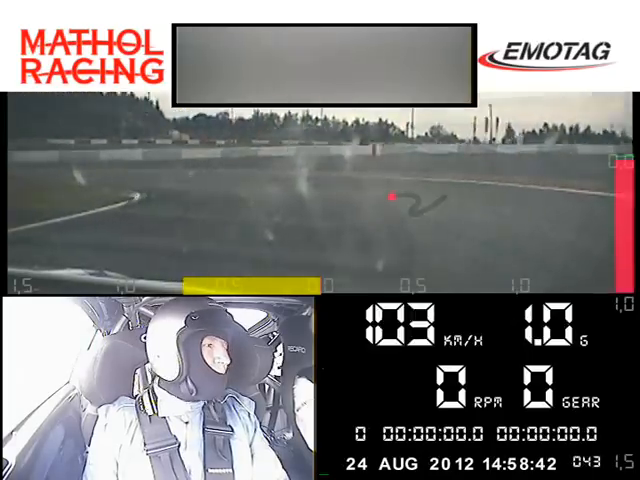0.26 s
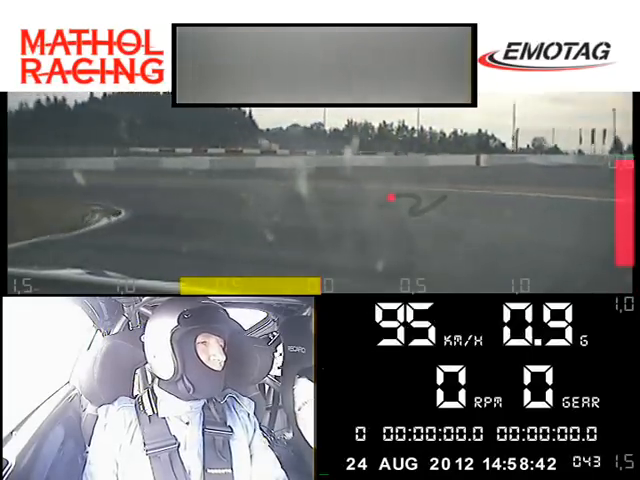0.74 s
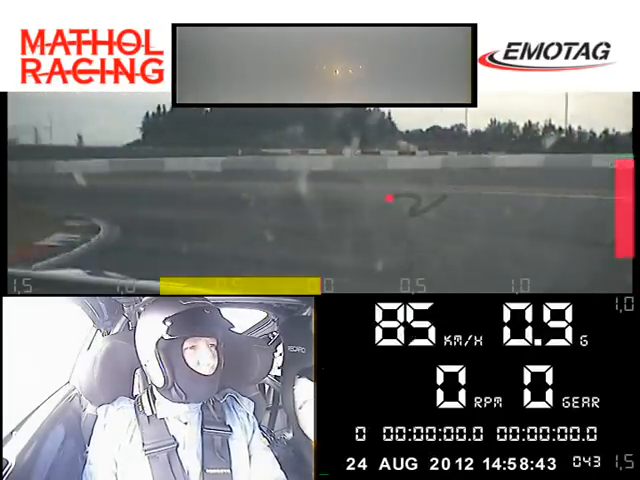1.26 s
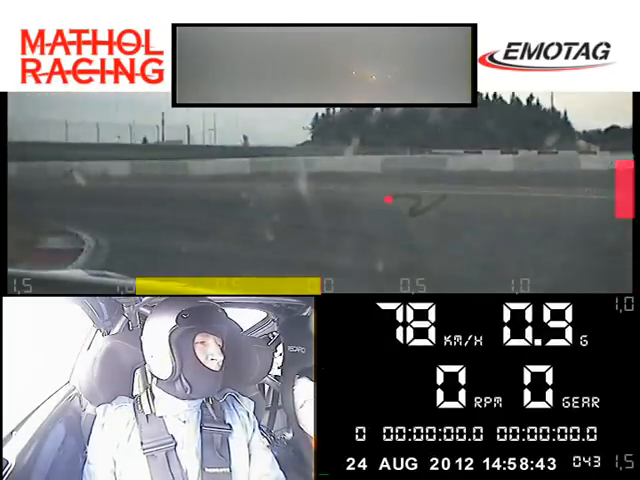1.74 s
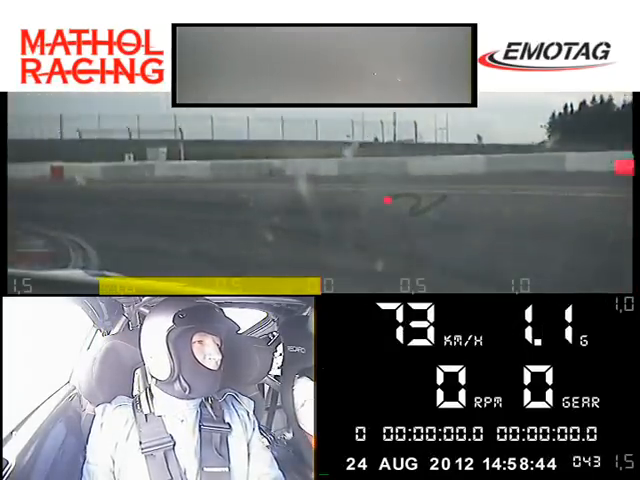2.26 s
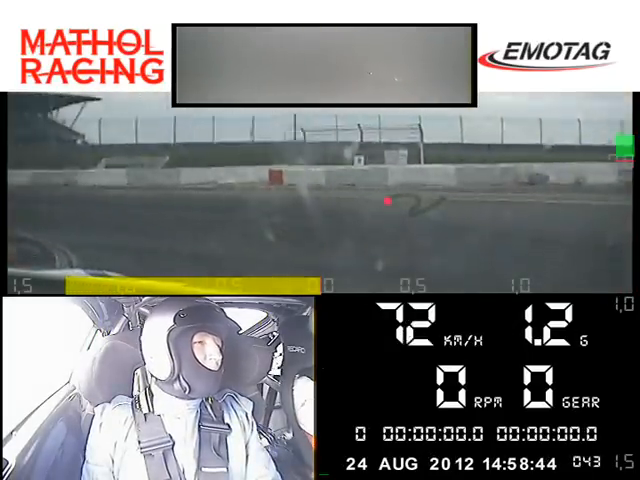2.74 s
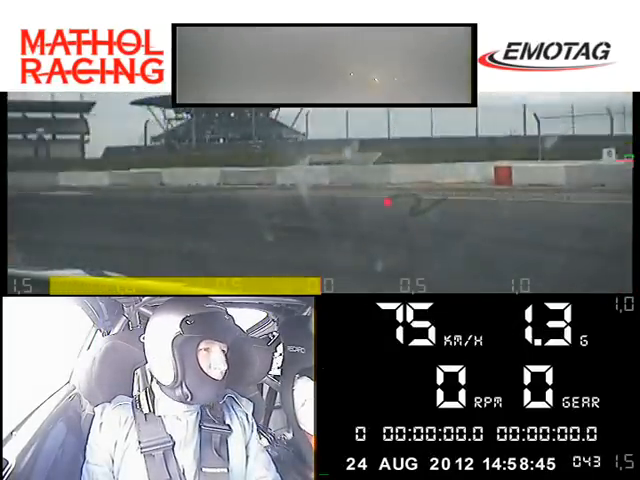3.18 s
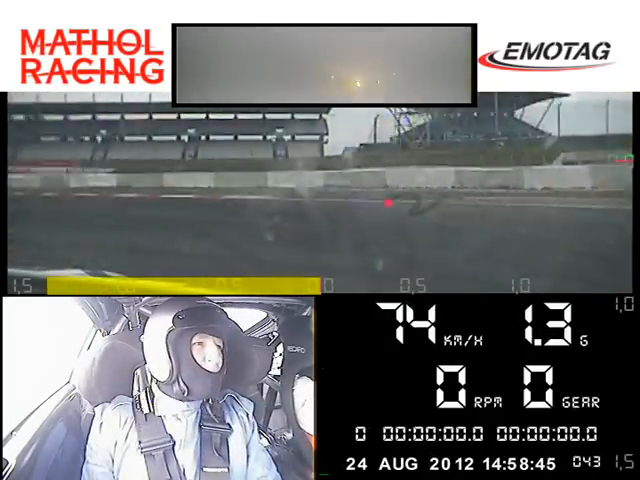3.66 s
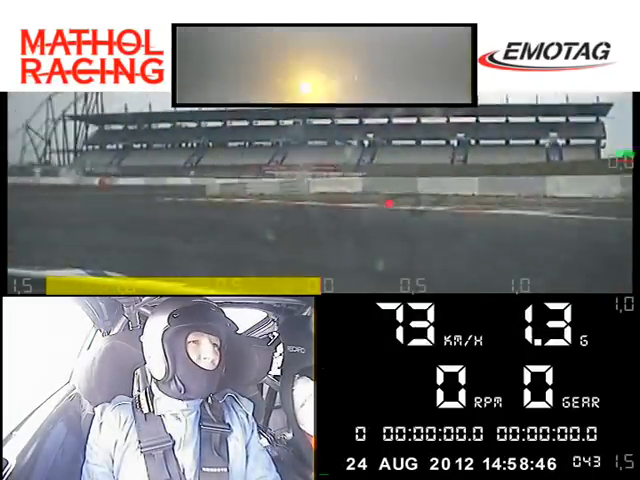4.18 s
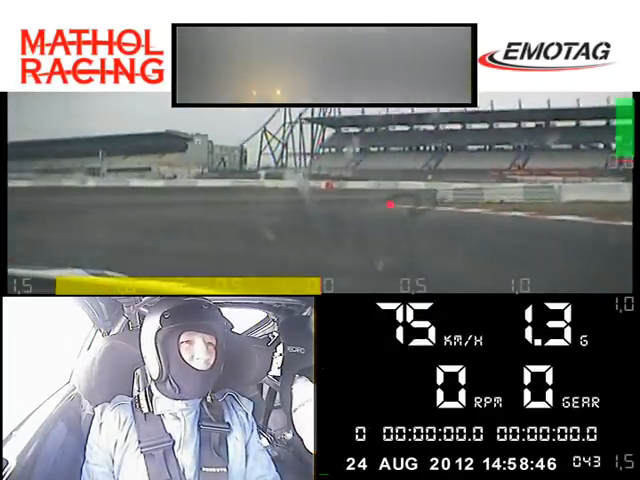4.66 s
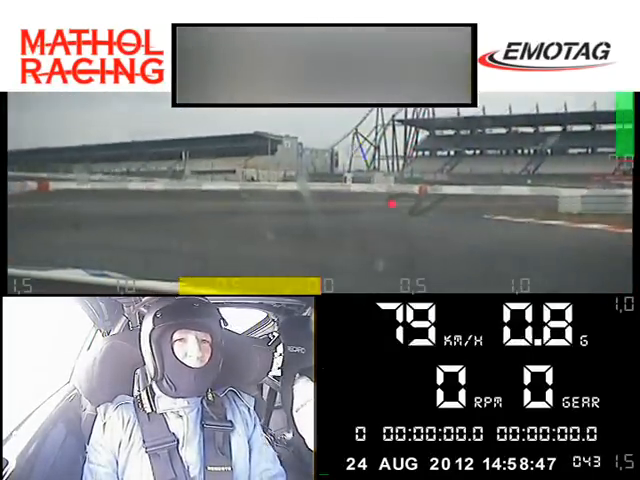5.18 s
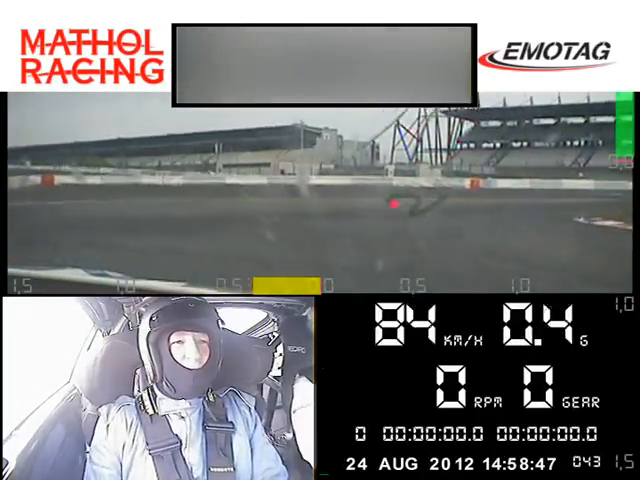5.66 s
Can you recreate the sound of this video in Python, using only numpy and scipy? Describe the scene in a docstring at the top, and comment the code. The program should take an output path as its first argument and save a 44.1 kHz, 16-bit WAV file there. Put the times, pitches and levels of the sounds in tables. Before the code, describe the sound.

Inside a race car, a V8 barks once, burbles and pops off the throttle, then accelerates hard over steady tyre roar.

```python
"""Inside a V8 race car, microphone in the bare cabin, nearly mono, over a steady roar of tyres and road.
It opens on a throttle blip that howls and barks. From 1 s the car coasts into a corner, unburnt fuel
popping in the exhaust, a loose fitting buzzing now and then. A squeeze at 2.5 s; from 4.2 s it builds to
full power, eight firings a cycle booming in the exhaust, rasping in its pipes and hissing, until the
lift at 5.8 s. The loudest stretch overloads the microphone."""
import sys
import numpy as np
from scipy import signal
from scipy.fft import rfft, irfft
from scipy.io import wavfile
from scipy.ndimage import uniform_filter1d

SR = 44100
rng = np.random.default_rng(int(sys.argv[2]) if len(sys.argv) > 2 else 0)


def output_pcm(signal):
    """Save a mono or channel-first signal as 16-bit PCM at the path in sys.argv[1].

    Samples are clipped to [-1, 1] before scaling.
    """
    pcm = np.clip(np.atleast_2d(signal).T, -1, 1) * 32767
    wavfile.write(sys.argv[1], SR, np.round(pcm).astype(np.int16))


N = 261072
T = np.arange(N) / SR
COAST_LOAD, FULL_LOAD = 2, 5  # load runs from 0, throttle shut, to 5, wide open
BLIP_START_S = 0.11

# tyre and body roar at the microphone: f/Hz, relative level/dB
ROAD_SPECTRUM = [(15, -11), (40, -5), (90, -6.5), (200, 0), (400, -2), (650, -4), (1000, -10),
                 (1800, -17.5), (3000, -23.5), (6000, -34), (12000, -40)]
# loose fittings buzzing in the cabin: t/s, level/dB
RATTLE_EVENTS = [(1.345, -48), (1.995, -45), (3.37, -44), (3.8, -44)]
# unburnt fuel popping in the exhaust: t/s, level/dB, main ring f/Hz
FUEL_POPS = [(0.275, -8, 459), (1.016, -11.5, 235.4), (1.062, -9, 255), (1.154, -11, 396.4),
             (1.18, -9, 372), (1.247, -9.5, 248), (1.332, -9, 248.6), (1.36, -11, 379), (2.136, -13.5, 248),
             (2.17, -22, 234)]
# engine cycle rate, one cycle being two turns of the crank and eight firings: t/s, f/Hz
CYCLE_RATE = [(0.0, 41.5), (0.11, 41.7), (0.25, 44.9), (0.43, 45.0), (0.63, 48.2), (1.04, 44.6),
              (1.45, 40.2), (1.89, 38.3), (2.31, 37.4), (2.44, 38.6), (2.9, 39.8), (3.2, 39.9),
              (4.06, 38.8), (4.78, 41.6), (5.0, 41.4), (5.52, 45.4), (5.7, 46.6), (5.82, 45.1),
              (5.92, 45.4)]
# the driver's throttle, apart from the blip: t/s, load/0-5
THROTTLE_LOAD = [(.35, 2.03), (.62, 0.8), (.95, 1.67), (1.3, 0.97), (1.5, 0.11), (2.1, 1.13), (2.41, 2.08),
                 (2.5, 2.77), (2.68, 3.46), (2.95, 3.09), (3.2, 2.06), (4.17, 1.99), (4.6, 3.97),
                 (4.97, 4.01), (5.13, 5.01), (5.75, 4.704), (5.81, 2.07)]
# the firings as they leave the pipes: place in the cycle/0-1, relative level/dB
FIRING_PATTERN = [(0, 4), (.112, -13.5), (.243, -2), (.355, 0), (0.521, -1.5), (0.624, -5), (0.746, -6.5),
                  (0.882, -5)]
# hiss of the exhaust gas: f/Hz, relative level/dB
HISS_SPECTRUM = [(300, -19), (900, -29.5), (2000, 12), (3200, 8), (4500, 2), (6000, 0), (7400, -1.5),
                 (9000, -5), (12000, -11.5)]
# rasp of the pipes: f/Hz, relative level/dB
RASP_SPECTRUM = [(300, -55), (660, 2.5), (790, -1.5), (920, -1), (1300, 1), (1800, 0), (2300, -9.5),
                 (3200, -11.5), (4500, -23.5), (7000, -24.5), (12000, -46)]
# ringing of pipes and body panels: f/Hz, width/Hz, level over the rasp/dB, load that drives it hardest
PIPE_RESONANCES = [(1016, 56, 13, 2.02), (1236, 21, 13.5, 3.34), (1299, 19, 13.5, 2.3), (1614, 85, 9, 8.4),
                   (1868, 24, 7, 2.1), (2726, 240, 9, 4.05), (3566, 23, 14.5, 1)]
# upper orders that sing at a pipe resonance: multiple of the cycle rate, relative level/dB,
# resonance f/Hz, load at which it peaks
SINGING_ORDERS = [(25, -5.5, 1036, 4.2), (30, -3.5, 1226, 4.2), (31, -7.5, 1231, 3.2), (37, -9, 1691, 5.2),
                  (39, -12, 1671, 4.8), (40, -12, 1701, 4.8), (43, -10.5, 1691, 2.1)]
# air modes of cabin and exhaust that swell any order meeting them: f/Hz, width/Hz, gain/dB
AIR_MODES = [(251.4, 49.3, 23), (402.8, 73.7, 20.5), (542.5, 47.4, 20)]
# the exhaust's low orders: multiple of the cycle rate, relative level/dB at load 0, 1, 2, 3, 4, 5
BOOM_ORDERS = [(3, 9, 5.5, -23, 0.5, 0.5, -19), (4, -21, -9, -33, -10.5, 0, -29),
               (5, -6, -2, -21, -11.0, -6.5, -18.5), (6, -12, -11.5, -10.5, 0, -10.5, -27.5),
               (7, -9, -7, -23.5, -0.5, -28.5, -17), (8, 10.5, -10.5, -12, 8.5, -1.5, -7.5),
               (9, -17, -9.5, -17, -8, 4.0, -9), (10, -15, -4, -23.5, -0.5, -9.5, -18),
               (11, -4.5, -8.5, -20, 2, 0, -32), (12, -26, -10, -27.5, -4.5, -9.5, -17),
               (13, 3.5, -25, -32, 0, -1.5, -16), (14, -42, -10.5, -24, -2.5, -7.5, -9.5),
               (15, -32, -26.5, -52, -15.0, -2.5, -32.0), (16, 7.5, -19, -19.5, 4, 3, -8)]


def amp(db):
    """Decibels to gain."""
    return 10 ** (np.asarray(db) / 20)


def unit(x):
    """Scales to rms 1."""
    return x / np.sqrt(np.mean(abs(x) ** 2) + 1e-20)


def curve(rows):
    """A time table's value at every sample."""
    return np.interp(T, *np.transpose(rows))


def bump(s, width_s):
    """A smooth swell of height 1 around one moment."""
    return np.exp(-((T - s) / width_s) ** 2)


def colour(x, spectrum):
    """Filters by a smooth spectrum of (f/Hz, level/dB) points, to rms 1."""
    hz = np.fft.rfftfreq(2 * N, 1 / SR)
    f, db = np.transpose(spectrum)
    gain = amp(np.interp(np.log(hz + 1), np.log(f), db))
    return unit(irfft(rfft(x, 2 * N) * gain)[:N])


def wander(hz):
    """Random drift of rms 1, mostly slower than hz."""
    coarse = T[::32]
    f = np.fft.rfftfreq(len(coarse), coarse[1])
    slow = rfft(rng.standard_normal(len(coarse))) / (1 + (f / hz) ** 4)
    return np.interp(T, coarse, unit(irfft(slow, len(coarse))))


def diffuse_sound():
    """Low and middle noise that gives the cabin its width."""
    spectrum = [(20, 5), (150, 17.5), (1300, 13), (3000, -4), (8000, -12.5), (12000, -22)]
    return colour(rng.standard_normal(N), spectrum)


def road(load, coast_db=-28, swell_db=1.6, db_per_load=2, rumble_hz=220):
    """Tyre and body roar, shaken harder under load; its rumble swells with the road surface."""
    roar = colour(rng.standard_normal(N), ROAD_SPECTRUM)
    rumble = signal.sosfiltfilt(signal.butter(2, rumble_hz, fs=SR, output="sos"), roar)
    swell = amp(swell_db * wander(5.6)) - 1
    return amp(coast_db + db_per_load * (load - COAST_LOAD)) * (roar + swell * rumble)


def rattles(width_s=0.015):
    """Loose fittings in the cabin give short, thin buzzes of metal."""
    level = sum(amp(db) * bump(s, width_s) for s, db in RATTLE_EVENTS)
    return level * colour(rng.standard_normal(N), [(1000, -18), (4000, -11), (12000, -6)])


def burble(ring_s=0.033, rise_s=0.0061, overtone=1.6, overtone_db=-17, crack_db=-22, crack_s=0.007):
    """Each pop of unburnt fuel thumps the exhaust's low resonances, with a dull crack."""
    out, t = np.zeros(N), np.arange(SR // 8) / SR
    dull = signal.butter(2, 1500, fs=SR)
    attack = 1 - np.exp(-t / rise_s)
    for s, db, hz in FUEL_POPS:
        phase = 2 * np.pi * hz * t
        ring = (np.sin(phase) + amp(overtone_db) * np.sin(overtone * phase)) * np.exp(-t / ring_s)
        crack = unit(signal.lfilter(*dull, rng.standard_normal(len(t)))) * np.exp(-t / crack_s)
        out[round(s * SR):][:len(t)] += amp(db) * (ring + amp(crack_db) * crack) * attack
    return out


def pedal(blip_s=0.249, snap_s=0.088):
    """Load on the engine, how hard it pushes the car (0-1) and how hard it brakes it (0-1)."""
    load = curve(THROTTLE_LOAD)
    push = np.maximum(load - COAST_LOAD, 0) / (FULL_LOAD - COAST_LOAD)
    braking = np.maximum(1 - load / COAST_LOAD, 0)
    # the downshift blip snaps the throttle open, too briefly for full pressure, and ends in a bark
    since = T - BLIP_START_S
    blip = np.clip(np.minimum(since, blip_s - since) / snap_s, 0, 1)
    pressure = 0.48 * blip * since / blip_s
    bark = 0.52 * bump(0.286, width_s=0.029)
    return load + blip * (FULL_LOAD - load), push + pressure + bark, braking


def exhaust_levels(rate, push, braking):
    """Boom, rasp and hiss in dB: all grow with push and engine braking; revs favour rasp and hiss."""
    revs_hz = rate - rate.mean()
    boom_db = -35.5 + 14.5 * push ** 0.63 + 6.5 * braking - 0.3 * revs_hz
    rasp_db = -34.5 + 23.5 * push ** 0.55 + 4 * braking + 0.09 * revs_hz
    hiss_db = -52 + 35 * push ** 1.46 + 8 * braking + 0.6 * revs_hz
    return boom_db, rasp_db, hiss_db


def unevenness(push, braking, stumble_s=0.11):
    """Smear of the boom and raggedness of the firings (0-1): least when coasting, most around a pop."""
    stumble = np.max([bump(s, stumble_s) for s, _, _ in FUEL_POPS], axis=0)
    smear = 0.11 + 0.12 * push + 0.078 * braking + 0.24 * stumble
    ragged = 0.13 + 0.11 * push + 0.11 * braking + 0.34 * stumble
    return np.clip(smear, 0, 1), np.clip(ragged, 0, 1)


def firings(cycles, ragged, jitter_s=0.00012, spread_db=7, max_cycles=300):
    """One sharp pressure pulse a cylinder each cycle, off in time and strength the more ragged it runs."""
    out, near = np.zeros(N + 32), np.arange(-8, 9)
    for place, db in FIRING_PATTERN:
        late, strong = rng.standard_normal((2, max_cycles))
        at = np.interp(np.arange(max_cycles) + place, cycles, np.arange(N), right=np.nan)
        at = at[np.isfinite(at)]
        rough = ragged[at.astype(int)]
        height = amp(db + spread_db * rough * strong[:len(at)])[:, None]
        at = np.clip(at + jitter_s * SR * rough * late[:len(at)], 8, N - 1)[:, None]
        taps = at.astype(int) + near  # a windowed sinc sets each pulse between samples
        np.add.at(out, taps, height * np.sinc(taps - at) * np.hanning(len(near)))
    return out[:N]


def cabin_scatter(x, spread_s=0.008, grain_hz=130.9):
    """The bare cabin delays every frequency by its own few milliseconds on the way to the microphone."""
    hz = np.fft.rfftfreq(2 * N, 1 / SR)
    delay_s = spread_s * np.interp(hz / grain_hz, np.arange(1000), rng.random(1000))
    return irfft(rfft(x, 2 * N) * np.exp(-2j * np.pi * np.cumsum(delay_s) * hz[1]))[:N]


def puffs(pulses, decay_s, steady):
    """Turbulent gas that spurts after each pulse, over a steady flow."""
    spurts = signal.lfilter([1], [1, -np.exp(-1 / (decay_s * SR))], pulses)
    return unit((steady + unit(spurts)) * rng.standard_normal(N))


def gas_hiss(pulses, flicker_db=0.23):
    """Exhaust gas hisses, pulsing lightly with the firings."""
    flicker = amp(flicker_db * wander(60))
    return flicker * colour(puffs(pulses, decay_s=0.0058, steady=3.1), HISS_SPECTRUM)


def blip_howl(cycles, rate, db=-16.5, from_hz=322, rise_hz_per_s=780, width_hz=28):
    """In the blip a resonance sweeps upward and lifts one order after another."""
    resonance_hz = from_hz + rise_hz_per_s * (T - BLIP_START_S)
    tone = np.zeros(N)
    for order, *_ in BOOM_ORDERS:
        tuned = np.exp(-((order * rate - resonance_hz) / width_hz) ** 2)
        tone += tuned * np.sin(2 * np.pi * order * cycles)
    return np.sqrt(2) * amp(db) * bump(BLIP_START_S + 0.1, width_s=0.085) * tone


def pipe_singing(cycles, rate, load, load_reach=0.95, width_hz=45, waver_db=2, throb=0.45):
    """Single orders swell on a pipe resonance at one throttle opening, throbbing once a cycle."""
    out = np.zeros(N)
    for order, db, hz, best_load in SINGING_ORDERS:
        tuned = np.exp(-((order * rate - hz) / width_hz) ** 2 - ((load - best_load) / load_reach) ** 2)
        out += np.sqrt(2) * amp(db + waver_db * wander(19)) * tuned * np.cos(2 * np.pi * order * cycles)
    return out * (1 + throb * np.cos(2 * np.pi * cycles))


def pipe_rasp(pulses, ragged, load, load_reach=2.37):
    """Firings and gas rasp in the pipes at an even level; each resonance rings most near its own load."""
    gas = amp(-14 + 22 * ragged)  # ragged firings carry more gas
    drive = unit(cabin_scatter(pulses)) + gas * puffs(pulses, decay_s=0.011, steady=0.5)
    plain = colour(drive, RASP_SPECTRUM)
    out = plain.copy()
    for hz, width_hz, db, best_load in PIPE_RESONANCES:
        ring = signal.lfilter(*signal.iirpeak(hz, hz / width_hz, fs=SR), plain)
        out += (amp(db) - 1) * np.exp(-((load - best_load) / load_reach) ** 2) * ring
    return out / np.sqrt(uniform_filter1d(out ** 2, size=6000) + 1e-9)


def exhaust_boom(cycles, rate, load, smear, flutter=0.63, surge=0.99, pipe_hz=330, pipe_width_hz=260):
    """Low orders of the firing pattern: load shifts their balance, air modes lift them, smear blurs them."""
    place, firing_db = np.transpose(FIRING_PATTERN)
    out, power = np.zeros(N), np.zeros(N)
    for order, *levels_db in BOOM_ORDERS:
        hz = order * rate
        pattern = np.sum(amp(firing_db) * np.exp(-2j * np.pi * order * place))
        pipe_shift = np.angle(pattern / (1 + 2j * (hz - pipe_hz) / pipe_width_hz))
        phase = 2 * np.pi * order * cycles + pipe_shift
        drone = 1 + sum((amp(db) - 1) / (1 + (2 * (hz - mode_hz) / width_hz) ** 2)
                        for mode_hz, width_hz, db in AIR_MODES)
        height = np.interp(load, np.arange(len(levels_db)), amp(levels_db))
        blur = wander(11.7) * np.cos(phase) + wander(7.3) * np.sin(phase)
        out += drone * height * (np.cos(phase) + flutter * smear * blur)
        power += height ** 2 / 2
    return out * (1 + surge * smear * wander(100)) / np.sqrt(power * (1 + 2 * smear ** 2))


def engine(rate, load, smear, ragged, boom_db, rasp_db, hiss_db, rate_drift=0.001326):
    """The V8 from the cabin: rasp, hiss, boom and the blip's howl, all locked to the crank."""
    cycles = np.cumsum(rate * (1 + rate_drift * wander(11.27))) / SR
    pulses = firings(cycles, ragged)
    rasp = amp(rasp_db) * (amp(-2) * pipe_rasp(pulses, ragged, load) + pipe_singing(cycles, rate, load))
    hiss = amp(hiss_db) * gas_hiss(pulses)
    boom = amp(boom_db) * exhaust_boom(cycles, rate, load, smear)
    return rasp + hiss + boom + blip_howl(cycles, rate)


def scene():
    """The cabin at the microphone: nearly mono, with a faint diffuse width that follows the rasp."""
    rate = curve(CYCLE_RATE)
    load, push, braking = pedal()
    boom_db, rasp_db, hiss_db = exhaust_levels(rate, push, braking)
    smear, ragged = unevenness(push, braking)
    v8 = engine(rate, load, smear, ragged, boom_db, rasp_db, hiss_db)
    mid = v8 + burble() + road(load) + rattles()
    side = amp(rasp_db - 21.5) * diffuse_sound()
    return np.array([mid + side, mid - side])


def record(dry, drive_db=0.76, ceiling=0.98, knee=4.2, cutoff_hz=12150):
    """The overloaded microphone flattens the highest peaks; then the top treble is cut off."""
    driven = dry * amp(drive_db)
    clipped = driven / (1 + abs(driven / ceiling) ** knee) ** (1 / knee)
    lowpass = signal.firwin(511, cutoff_hz, window=("kaiser", 9), fs=SR)
    return signal.oaconvolve(clipped, lowpass[None], "same")


dry = scene()
out = record(dry)
output_pcm(out)
```